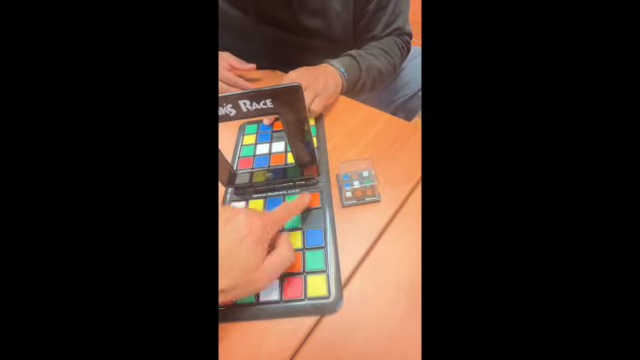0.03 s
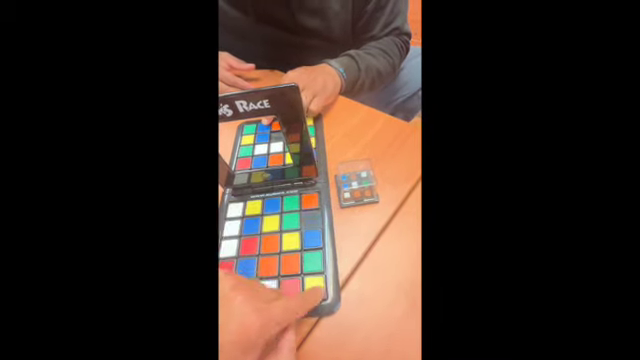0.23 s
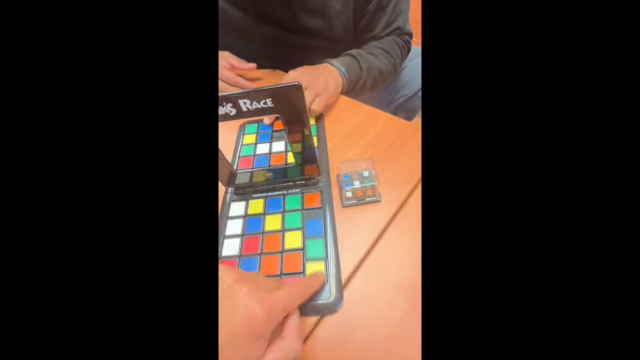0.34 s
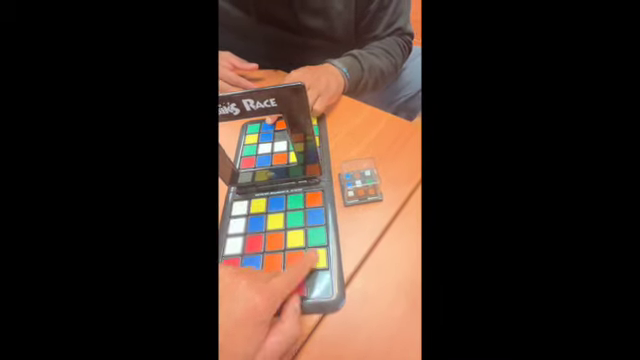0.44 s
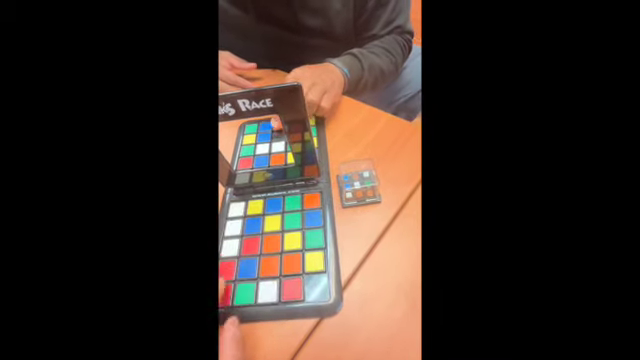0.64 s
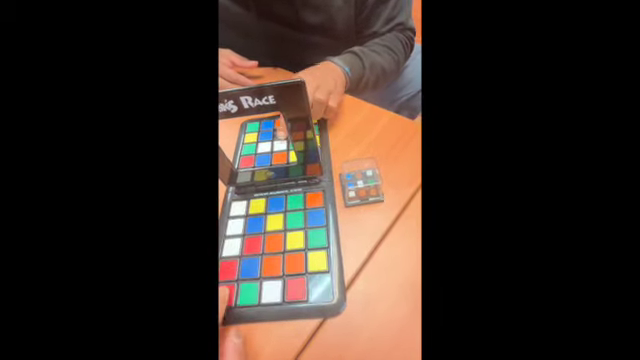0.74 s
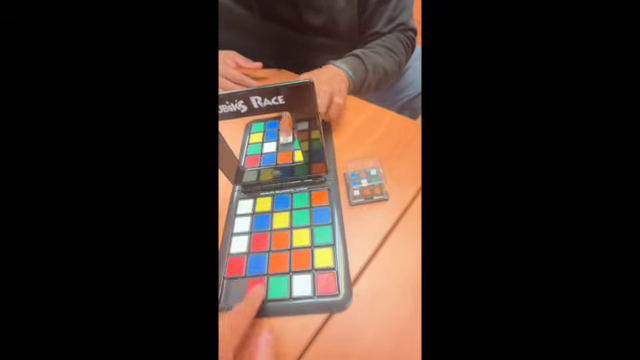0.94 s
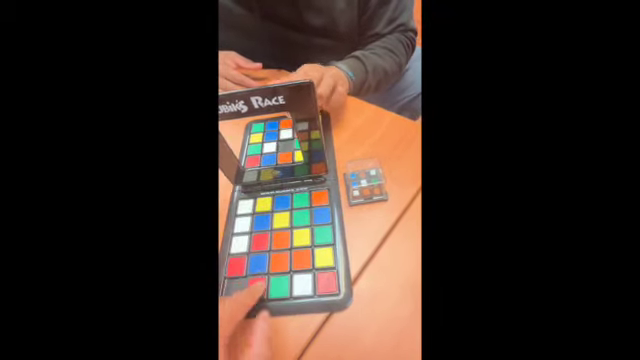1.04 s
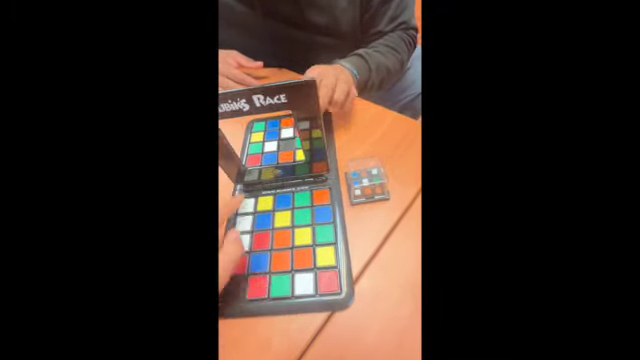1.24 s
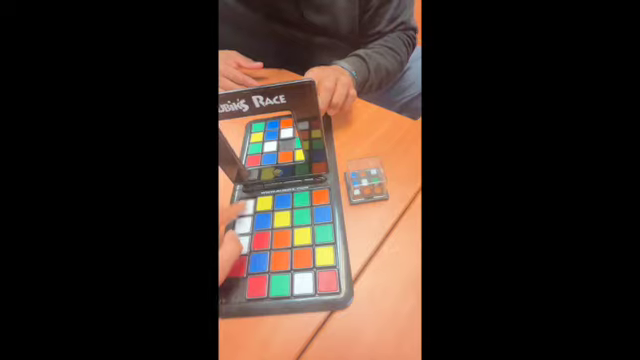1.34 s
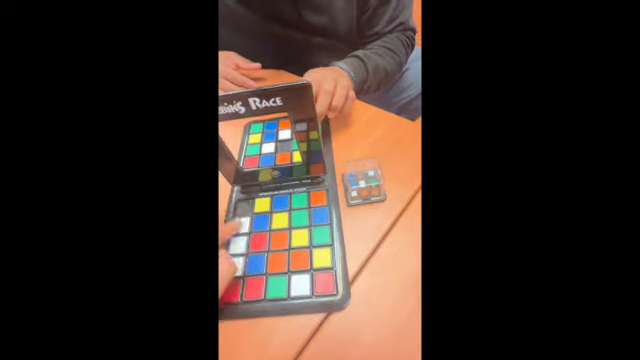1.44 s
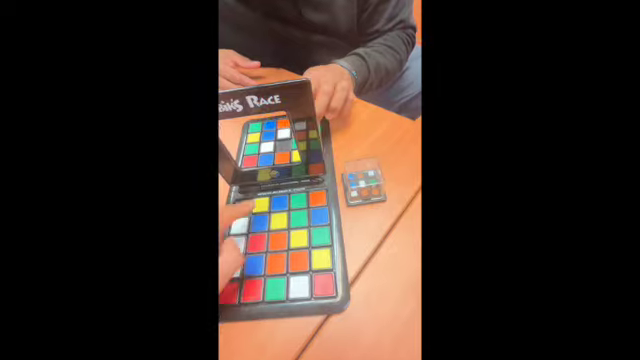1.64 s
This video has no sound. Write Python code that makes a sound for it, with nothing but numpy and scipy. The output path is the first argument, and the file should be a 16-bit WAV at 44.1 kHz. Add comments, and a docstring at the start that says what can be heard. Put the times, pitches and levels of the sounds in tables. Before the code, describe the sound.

Plastic tiles slide across a puzzle tray on a table in three quick moves. Each is a light touch, a gritty scrape and a sharp clack, heard close by in a small room with a low rumble.

```python
"""A small room: a finger pushes plastic tiles across a sliding puzzle's tray on a table, three times.
Each move is a light touch, a gritty scrape of tiny slips, and a clack as the tile meets its neighbour.
Contacts chatter, ring the plastic and draw a short hollow note from the tray.
The room answers briefly over a low rumble, in which a hum sags and fades at the start."""
import sys
import numpy as np
from scipy import signal
from scipy.fft import rfft, irfft
from scipy.io import wavfile
from scipy.ndimage import uniform_filter1d

SR = 44100
rng = np.random.default_rng(int(sys.argv[2]) if len(sys.argv) > 2 else 0)


def generate_wav(signal):
    """Clip the signal to [-1, 1] and save it as 16-bit WAV at the path in sys.argv[1]."""
    frames = np.transpose(np.atleast_2d(signal))
    scaled = np.clip(frames, -1, 1) * 32767
    pcm = np.round(scaled).astype(np.int16)
    wavfile.write(sys.argv[1], SR, pcm)


N = 74970
FFT_SIZE = 8192
TILE_CORRELATION = 0.83  # left with right


def clack(level_db, treble_db, rise_s, rattle_s, tray_hz, tray_db, tile_hz):
    """A tile chatters against its neighbour; the tray under it gives a short hollow note."""
    # freq_hz, density_db
    tile_spectrum = [(150, -24), (600, -19), (1000, -8.5), (1600, -4), (2400, 0), (3700, 2), (5000, -2.5),
                     (6200, -5), (7800, 3), (10000, -13), (13000, -12.5), (16000, -20)]
    # freq_ratio, level_db, t60_s
    tray_modes = [(.55, -20, 0.0078), (1, -2.5, 0.014), (1.33, 1.5, 0.0044)]
    ring_t60_s, tail_db, tail_t60_s = 0.018, -14, 0.085
    tray_lag_s, tray_rise_s = 0.0008, 0.0011
    t = np.arange(FFT_SIZE // 2) / SR
    attack = np.minimum((t + 1 / SR) / rise_s, 1)
    decay_s = np.maximum(t - rattle_s, 0)
    envelope = attack * (amp(-60 * decay_s / ring_t60_s) + amp(tail_db - 60 * decay_s / tail_t60_s))
    drive = stereo_pair(chatter(envelope), chatter(envelope), TILE_CORRELATION)
    tile = plastic(drive, tile_spectrum, tile_hz, ring_width_hz=600, treble_db=treble_db)
    tray_s = np.maximum(t - tray_lag_s, 0)
    modes = sum((-1) ** k * amp(db - 60 * tray_s / t60_s) * np.sin(2 * np.pi * ratio * tray_hz * tray_s)
                for k, (ratio, db, t60_s) in enumerate(tray_modes))
    tray = 2 * (1 - np.exp(-tray_s / tray_rise_s)) * amp(tray_db) * modes
    return amp(level_db) * (tile + tray)


def chatter(envelope, passes=6):
    """A burst of tiny contacts under an envelope, with an even spectrum."""
    burst = rng.standard_normal(len(envelope)) * envelope
    for _ in range(passes):
        flat = irfft(np.exp(1j * np.angle(rfft(burst))), len(burst))
        local_rms = np.sqrt(abs(uniform_filter1d(flat ** 2, size=48)) + 1e-20)
        burst = flat * envelope / local_rms
    return burst


def slides():
    """Tiles rub along the tray with a slight judder: a hollow scrape and a fine hiss."""
    # one path per slide: time_s, scrape_db, hiss_db
    paths = [
        [(.262, -59.5, -57), (.272, -43, -55.5), (.295, -39.5, -45.5), (.312, -36.5, -49), (.33, -44, -53),
         (.358, -37.5, -41), (.37, -40, -41.5), (.386, -35, -54.5), (.405, -73, -71)],
        [(.743, -65, -88.5), (.75, -46.5, -63), (.785, -44, -56.5), (.82, -43, -55.5), (.855, -55, -62.5),
         (.885, -45, -59), (.915, -40, -41.5), (.95, -36.5, -49), (.975, -50, -50.5), (.995, -54.5, -54),
         (1.03, -53.5, -67.5), (1.075, -50.5, -79)],
        [(1.312, -55.5, -83.5), (1.335, -45.5, -63.5), (1.357, -39.5, -50), (1.39, -47, -54), (1.412, -41, -46),
         (1.438, -40.5, -51), (1.46, -52, -76)],
    ]
    # faint tile ring, one per slide: pitch_hz
    rings_hz = [2150, 2800, 2680]
    # both: freq_hz, density_db
    scrape_spectrum = [(200, -30), (600, -9), (1050, 1), (1600, -2), (2300, -2), (3100, -1), (3800, -1.5),
                       (5000, -4), (6500, -20.5), (16000, -49)]
    hiss_spectrum = [(1000, -45.5), (4000, -30), (6000, -9.5), (8100, 7.5), (9300, -7.5), (10300, -12),
                     (12500, -7), (14000, -7.5), (16000, -22.5)]
    judder_rms_db, judder_cutoff_hz = 0.5, 113.7
    t, hz = np.arange(N) / SR, np.fft.rfftfreq(N, 1 / SR)
    judder = unit_rms(irfft(rfft(rng.standard_normal(N)) / (1 + (hz / judder_cutoff_hz) ** 4), N))
    rub = stereo_pair(friction(), friction(), TILE_CORRELATION)
    rub = unit_rms(rub * amp(judder_rms_db * judder))
    mix = np.zeros((2, N))
    for path, ring_hz in zip(paths, rings_hz):
        time_s, scrape_db, hiss_db = np.transpose(path)
        moving = (t >= time_s[0]) & (t <= time_s[-1])
        for level_db, spectrum in (scrape_db, scrape_spectrum), (hiss_db, hiss_spectrum):
            drive = rub * moving * amp(np.interp(t, time_s, level_db))
            mix += plastic(drive, spectrum, ring_hz, ring_width_hz=230)
    return mix


def friction(slips_per_s=2800, spread_db=2.5, smooth_share=0.4):
    """Dense tiny slips over a smooth rub."""
    impulses = (rng.random(N) < slips_per_s / SR) * rng.choice([-1, 1], N)
    slips = impulses * amp(spread_db * np.minimum(rng.exponential(1, N), 4))
    return np.sqrt(1 - smooth_share) * unit_rms(slips) + np.sqrt(smooth_share) * rng.standard_normal(N)


def plastic(drive, spectrum, ring_hz, ring_width_hz, ring_lift_db=6, treble_db=0):
    """Tile and tray resonate under a blow or rub: a minimum-phase filter of unit energy."""
    # freq_hz, width_hz, lift_db
    body_resonances = [(1330, 160, 1), (1937, 57, 7), (2164, 170, 5), (2870, 240, 9.5), (3230, 150, 6.5),
                       (4320, 200, 3.5), (5110, 89, 9.5), (6950, 450, -1.5), (8120, 670, -7.5)]
    resonances = [*body_resonances, (ring_hz, ring_width_hz, ring_lift_db)]
    hz = abs(np.fft.fftfreq(FFT_SIZE, 1 / SR))
    peaks_db = sum(lift_db / (1 + (2 * (hz - freq_hz) / width_hz) ** 2)
                   for freq_hz, width_hz, lift_db in resonances)
    shelf_db = treble_db * hz ** 4 / (hz ** 4 + 5000 ** 4)
    log_gain = np.log(amp(curve_at(spectrum, hz) + peaks_db + shelf_db))
    response = np.fft.ifft(np.exp(np.conj(signal.hilbert(log_gain)))).real[:FFT_SIZE // 4]
    response = response / np.linalg.norm(response)
    return signal.fftconvolve(drive, response[None], axes=1)[:, :drive.shape[1]]


def microphones(tiles):
    """The tray lies nearer the left microphone: mostly earlier there, and fuller in the middle range."""
    # freq_hz, left_over_right_db
    balance = [(100, -2), (350, 24), (700, 9.5), (1300, 8), (2400, 1.5), (4400, -5.5), (8000, 1.5),
               (15000, -1.5)]
    # freq_hz, left_lead_rad
    phase_lead = [(100, -1), (1500, 0.78), (2100, 1.52), (2800, 2.5), (5000, 3.5), (6600, 3.5), (8200, 5.5),
                  (11200, 11), (16000, 16.5)]
    hz = np.fft.rfftfreq(N, 1 / SR)
    left = amp(curve_at(balance, hz) / 2)
    right = np.exp(-1j * curve_at(phase_lead, hz)) / left
    return irfft(rfft(tiles) * np.array([left, right]), N)


def room(tiles, level_db=-17.5, rise_s=0.0042):
    """A diffuse tail, with two treble notches at 6 and 10 kHz that are not the room's."""
    # freq_hz, t60_s
    decay_times = [(300, .35), (1500, 0.17), (4000, 0.23), (8000, 0.27), (14000, 0.22)]
    # freq_hz, gain_db
    tail_colour_with_treble_notches = [(300, 8.5), (4500, 1), (6000, -11), (8000, 2.5), (10300, -15),
                                       (12500, 4), (16000, -10)]
    hz, t, noise = signal.stft(rng.standard_normal((2, SR // 2)), SR, nperseg=256)
    colour_db = curve_at(tail_colour_with_treble_notches, hz)[:, None]
    band_db = colour_db - 60 * t / curve_at(decay_times, hz)[:, None]
    _, tail = signal.istft(noise * amp(band_db) * np.minimum(t / rise_s, 1), SR, nperseg=256)
    return amp(level_db) * signal.fftconvolve(tiles, tail / np.linalg.norm(tail[0]), axes=1)[:, :N]


def rumble(rms_db=-46.5):
    """Steady low background of the room, nearly the same on both sides."""
    # freq_hz, density_db
    spectrum = [(20, -17), (42, -11), (63, 0.5), (82, -9.5), (115, -2.5), (170, -3), (230, -5.5), (300, -3),
                (400, -11.5), (550, -17), (1100, -22), (2500, -33), (5000, -42.5), (9000, -56),
                (16000, -80)]
    # freq_hz, left_right_correlation
    correlation = [(100, .99), (300, 1), (700, 0.23), (2000, 0.1), (8000, 0.103)]
    # freq_hz, left_over_right_db
    balance = [(70, 0.5), (300, 2.5), (800, 7.5), (1400, 8), (4000, -0.5)]
    hz = np.fft.rfftfreq(N, 1 / SR)
    noise = stereo_pair(*rfft(rng.standard_normal((2, N))), curve_at(correlation, hz))
    gain_db = curve_at(spectrum, hz) + curve_at(balance, hz) * np.array([[0.5], [-0.5]])
    return amp(rms_db) * unit_rms(irfft(noise * amp(gain_db), N))


def hum():
    """A faint low hum sags and fades."""
    # time_s, pitch_hz, level_db
    contour = [(0, 107.8, -42), (.04, 110.4, -50), (.12, 109.3, -44), (.19, 96, -54.5), (0.249, 90.7, -55)]
    # harmonics 1 to 3: gain_db
    harmonics_db = [3.5, -2, -5]
    t = np.arange(N) / SR
    time_s, pitch_hz, level_db = np.transpose(contour)
    phase = 2 * np.pi * np.cumsum(np.interp(t, time_s, pitch_hz)) / SR
    tone = sum(amp(db) * np.sin(k * phase + 2 * np.pi * rng.random())
               for k, db in enumerate(harmonics_db, 1))
    return tone * amp(np.interp(t, time_s, level_db)) * (t < time_s[-1])


def amp(db):
    """Decibels to gain."""
    return 10 ** (np.asarray(db) / 20)


def unit_rms(x):
    """Scales to an rms of one."""
    return x / np.sqrt(np.mean(x ** 2) + 1e-20)


def curve_at(points, hz):
    """Interpolates a table on a log-frequency axis."""
    freq_hz, value = np.transpose(points)
    return np.interp(np.log(hz + 1), np.log(freq_hz + 1), value)


def stereo_pair(left, other, correlation):
    """Two correlated channels from two independent signals."""
    return np.array([left, correlation * left + np.sqrt(1 - correlation ** 2) * other])


def scene():
    """Slides and clacks in the room, over rumble and hum."""
    # start_s, level_db, treble_db, rise_s, rattle_s, tray_hz, tray_db, tile_hz
    contacts = [(0.2115, -28, -9.5, .003, 0.0064, 1308, -9, 3200),
                (0.269, -36.5, -1, .001, .003, 1306, -9.5, 8000),
                (0.2758, -31.5, -1.5, .001, 0.0025, 1300, -5.5, 2150),
                (0.303, -29, -5.5, .003, 0.0066, 1295, -3, 2150),
                (0.307, -33, -9, .001, 0.0025, 864, -5, 2800),
                (0.384, -17, 9.5, .0003, 0.002, 1342, 2.5, 1950),
                (0.6698, -39, -15, .001, 0.001, 970, 2.5, 2700),
                (0.6979, -36.5, -8.5, .002, .0055, 940, 6.5, 2000),
                (0.738, -51, -3, .001, 0.0084, 1060, 5, 3000),
                (0.825, -42, -12, .002, 0.0052, 1110, 12, 3000),
                (0.866, -44.5, -23, .002, 0.0022, 1030, 12.5, 1900),
                (0.9238, -20.5, 6, .0008, 0.002, 1022, 2, 2470),
                (0.9606, -20, 2.5, .0003, 0.0026, 928, -8, 5000),
                (1.0097, -37, -14, .001, 0.0027, 1050, -2, 2200),
                (1.018, -37, -18.5, .001, 0.0016, 1020, -3, 1900),
                (1.026, -41.5, -8, .001, 0.0026, 990, 3, 2000),
                (1.051, -45, -18.5, .002, 0.01, 924, 8, 2100),
                (1.311, -47, -9, .0005, 0.0028, 980, 6, 2700),
                (1.333, -43, 0.5, .001, 0.0026, 1070, 5, 2700),
                (1.355, -39, -13, .002, 0.0034, 1170, -6, 2200),
                (1.4363, -21, 0, .0008, .0022, 840, -3.5, 2170)]
    tiles = slides()
    for start_s, *blow in contacts:
        sound = clack(*blow)
        start = round(start_s * SR)
        tiles[:, start:start + sound.shape[1]] += sound[:, :N - start]
    return microphones(tiles) + room(tiles) + rumble() + hum()


def record(dry):
    """Low-pass at 16.4 kHz."""
    lowpass = signal.firwin(511, 16400, window=("kaiser", 9), fs=SR)
    return signal.oaconvolve(dry, lowpass[None], "same")


dry = scene()
out = record(dry)
generate_wav(out)
```